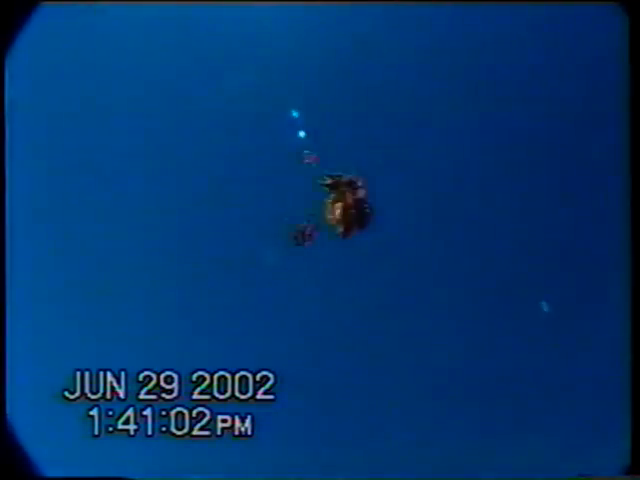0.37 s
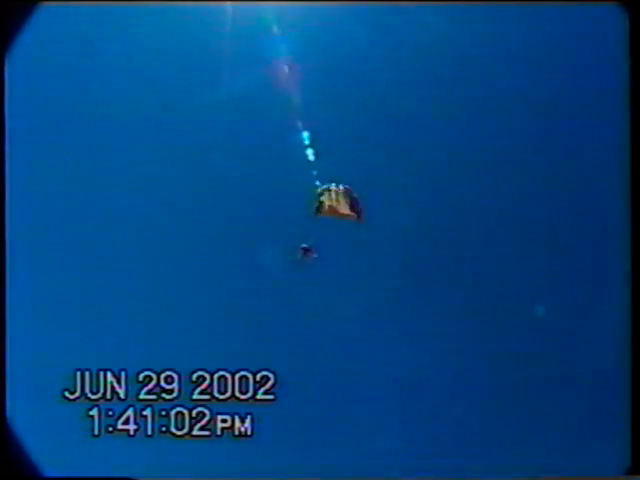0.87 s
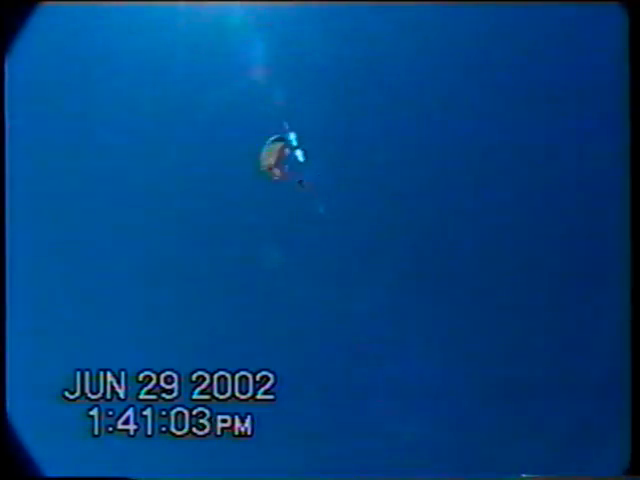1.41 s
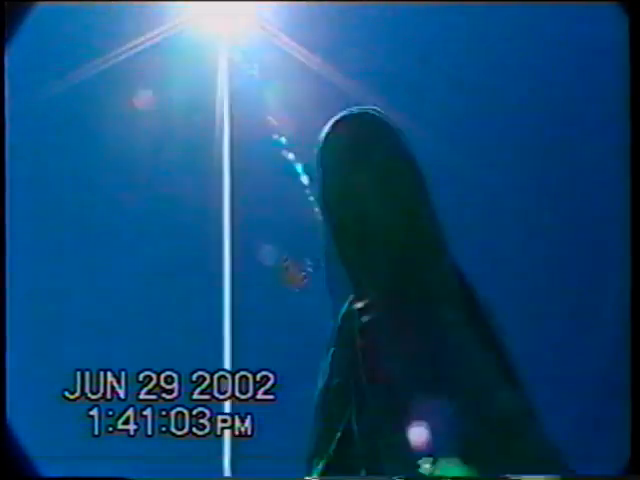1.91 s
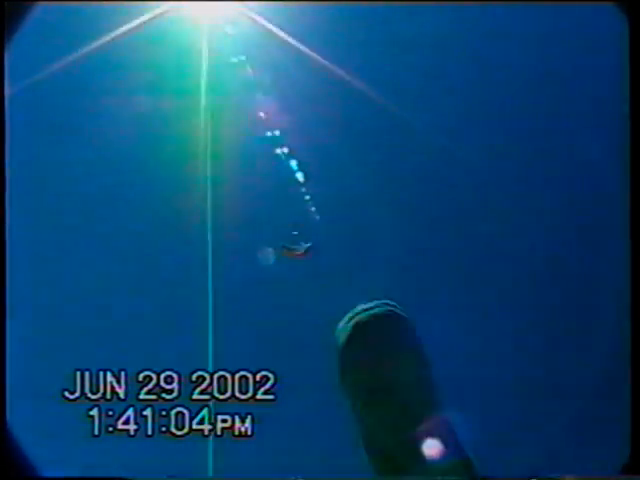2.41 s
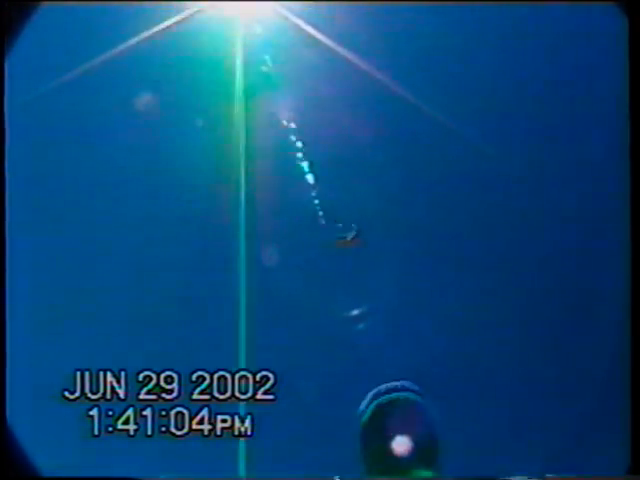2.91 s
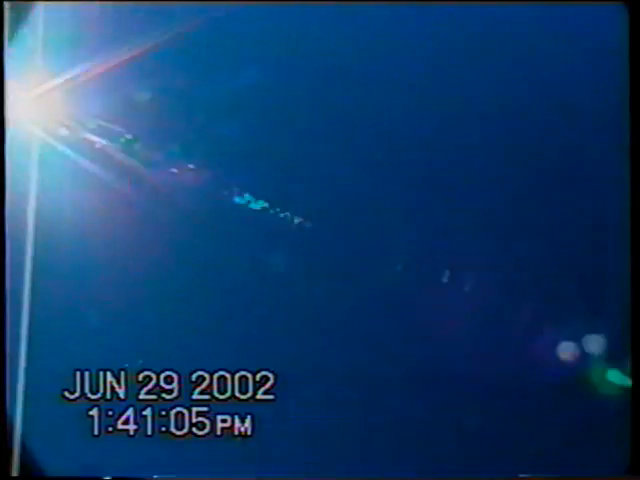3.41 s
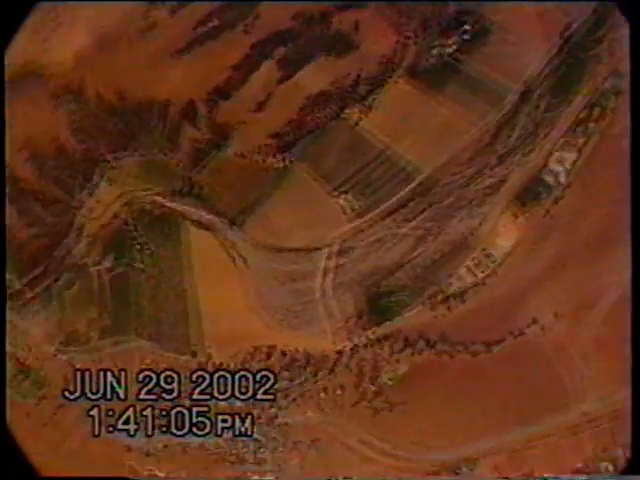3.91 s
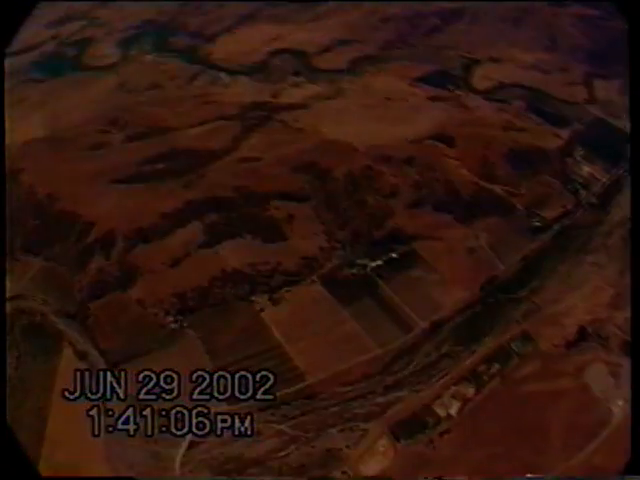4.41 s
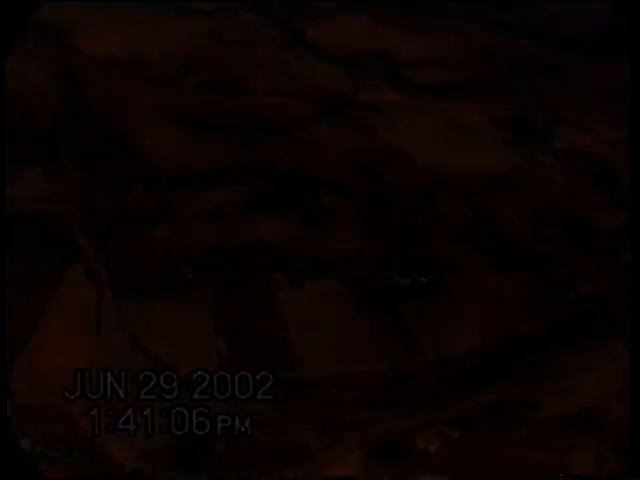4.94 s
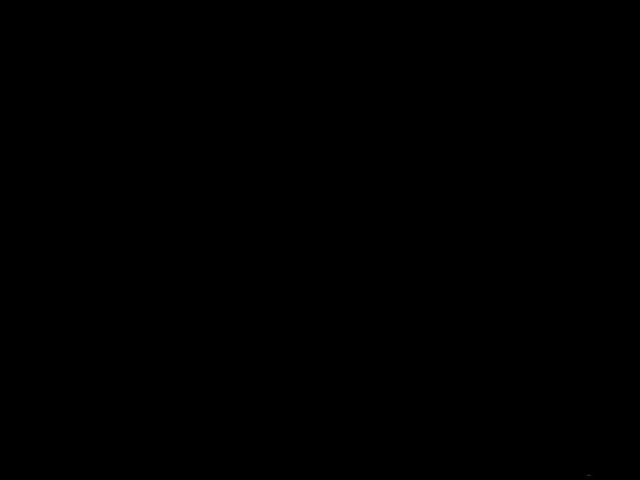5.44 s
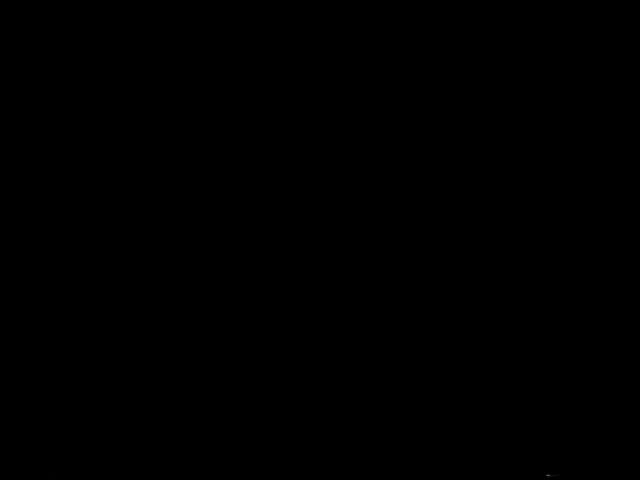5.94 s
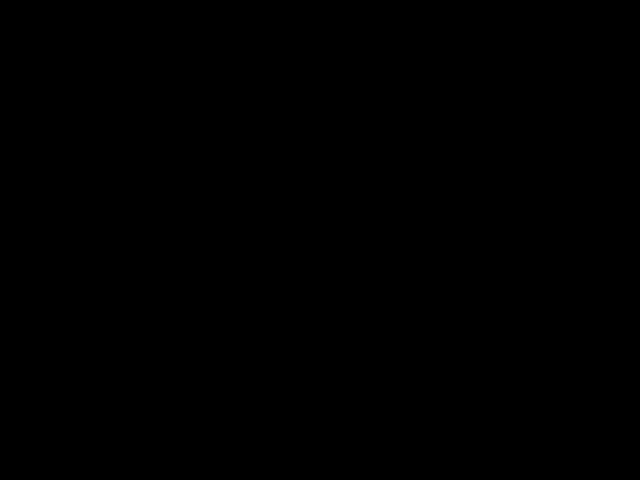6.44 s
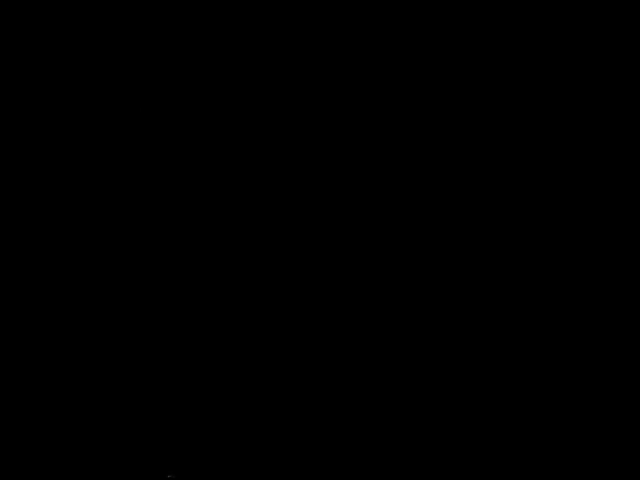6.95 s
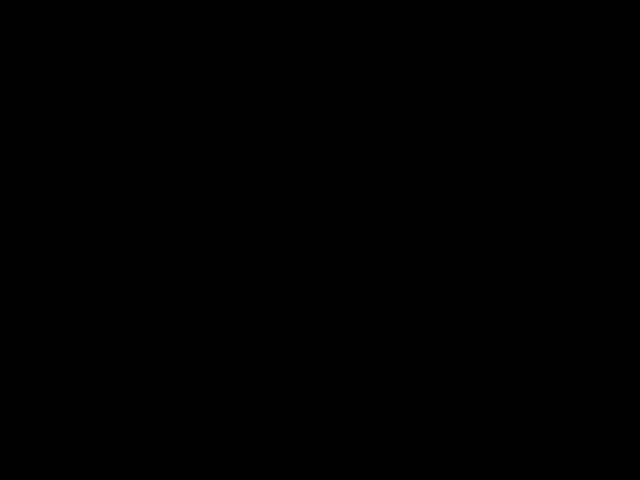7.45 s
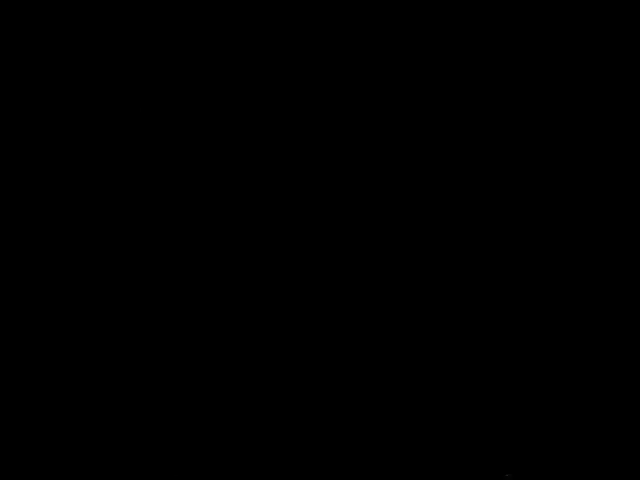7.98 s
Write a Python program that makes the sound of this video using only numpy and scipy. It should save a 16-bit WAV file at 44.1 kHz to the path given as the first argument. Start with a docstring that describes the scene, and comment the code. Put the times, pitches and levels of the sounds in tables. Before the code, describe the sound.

Freefall wind tears across a small camcorder microphone, badly overloaded. It starts as deep, ragged buffeting and thuds, quickly gaining a harsh, rushing upper roar. Near the middle, as the body rolls, the tone lurches and a breathy whistling edge comes forward. The thinner, brighter roar continues steadily, then fades out, leaving only faint tape hiss and a barely audible hum.

```python
"""Freefall wind tears over a small camcorder microphone: five sizes of eddy, each a gusting band of noise. They
drive the input far into overload: the signal slams between its limits, and the bass cut after it turns each
slam into a spike that sags back. The wind is then faded out, down to tape hiss (shaped noise) and a faint hum
(wavering sines). Left and right differ in brief narrow patches and by a small constant offset."""
import sys
import numpy as np
from scipy import signal
from scipy.fft import rfft, irfft, next_fast_len
from scipy.io import wavfile
from scipy.ndimage import map_coordinates

SR = 44100
rng = np.random.default_rng(int(sys.argv[2]) if len(sys.argv) > 2 else 0)


def pcm_store(signal):
    """Save signal as 16-bit PCM."""
    levels = np.round(np.clip(np.atleast_2d(signal), -1, 1) * 32767)
    wavfile.write(sys.argv[1], SR, levels.astype(np.int16).T)


def to_linear_factor(level_db):
    """Convert decibel levels (scalar or array-like) to linear amplitude factors."""
    exponent = np.asarray(level_db, float) / 20
    return 10 ** exponent


N = 356752

# tape hiss, spectrum shape: (frequency [Hz], relative density [dB])
HISS_SHAPE = [(20, -16), (70, -5.5), (150, -11), (400, -14.5), (800, -16), (1100, -20), (4000, -21),
              (14500, -24)]
# hum tones: (frequency [Hz], mean level [dB rms])
HUM_TONES = [(60, -78.5), (72, -70), (90, -76.5), (120, -82), (180, -84.5), (240, -78), (300, -84),
             (420, -87), (540, -88.5), (720, -86), (1020, -92.5), (1140, -88)]
# side signal where a patch is open: (frequency [Hz], level relative to shared sound [dB])
SIDE_LEVEL = [(60, -19.5), (150, -36.5), (370, -42), (700, -33), (1300, -24.5), (3000, -10.5),
              (8000, -13.5), (13900, -13.5)]
# chance that a side patch is open: (frequency [Hz], share of time [0-1])
PATCH_SHARE = [(0, .6), (400, .05), (1000, .35), (1800, .08), (6000, .08), (10000, .03), (13500, .12)]
# biggest eddies, spectrum shape: (frequency [Hz], relative density [dB])
THUD_SHAPE = [(20, -5.5), (60, -0.5), (130, -1.5), (250, -7), (600, -28.5), (3000, -47.5), (16000, -84.5)]
# middle-sized eddies: (centre [Hz], width of one pass [Hz], relative level [dB])
BUFFET_BANDS = [(320, 474, 0)]
# small eddies: (centre [Hz], width of one pass [Hz], relative level [dB])
SHEAR_BANDS = [(1560, 1780, 2), (5250, 5330, -12)]
# air ringing behind the grille: (centre [Hz], width of one pass [Hz], relative level [dB])
GRILLE_BANDS = [(2980, 1900, 0)]
# as the fall speeds up, big eddies fade and small ones grow:
# (time [s], fading of thud and buffet [0-1], growth of roar, shear and whistle [0-1])
EDDY_FINENESS = [(0, 0, .02), (.4, 0.24, 0.13), (.7, 0, .2), (.85, 0.34, 0.37), (1.05, 0.38, .75),
                 (1.6, 0.32, 0.46), (2.1, .45, 0.76), (2.6, 0.49, .8), (3.4, 0.51, .8), (3.9, 0.68, .95),
                 (4.2, 1, 0.99), (4.7, .95, .95), (5.4, 0.97, .8), (5.72, .7, .75), (6.1, 0.92, 0.89),
                 (6.37, 0.69, 0.79), (6.55, .95, .9), (7.5, .9, .98)]
# the body rolls over; the roar slides and thins, the grille faces the wind:
# (time [s], roar shift [Hz], roar gain [dB], shear gain [dB], whistle gain [dB])
BODY_ROLL = [(3.45, 0, 0, -0.5, -1), (3.53, -130, -4, 0, 2), (3.57, 250, -3, -0.5, 8),
             (3.62, 380, 1.5, 0.5, -2), (3.68, -200, -1.5, 0.5, 2.5), (3.73, 120, -0.5, 2.5, 7.5),
             (3.79, 400, -1.5, 2, 6), (3.86, 200, -5.5, 4.5, 7.5), (3.93, 100, -6.5, 3, 7.5),
             (4.02, 59.5, -8, -3, 9), (4.07, 0, 3.5, 1, 7.5), (4.12, 0, 0, 0, 0)]
# tape path response: (frequency [Hz], relative gain [dB])
TAPE_RESPONSE = [(30, -2.5), (100, 1), (300, -1.5), (600, 0), (1000, -1), (3000, 0), (6000, -2),
                 (10000, -6), (15000, -6.5)]
# wind after overload, before wobble and closing: (time [s], level [dB])
WIND_LEVEL = [(0, -25), (.12, -22.5), (1.2, -22), (2.1, -23), (3.4, -22), (3.85, -23.5), (4.2, -22.5),
              (5.4, -22), (6.1, -22), (6.4, -26), (6.52, -27), (6.85, -38), (7.05, -40.5), (7.3, -45),
              (7.35, -49.5), (7.42, -61), (7.47, -73)]


def unit(x):
    """Scaled to rms 1."""
    return x / np.sqrt(np.mean(x ** 2) + 1e-20)


def along(points, hz):
    """(Hz, value) points interpolated on a log frequency axis."""
    f, v = np.transpose(points)
    return np.interp(np.log(hz + 1), np.log(f + 1), v)


def curves(rows):
    """One value per sample for each column after the time."""
    s, *cols = np.transpose(rows)
    return [np.interp(np.arange(N) / SR, s, c) for c in cols]


def wobble(rate_hz):
    """A smooth random curve, rate_hz knots a second."""
    knots = rng.standard_normal(int(N * rate_hz / SR) + 4)
    return map_coordinates(knots, [np.arange(N) * rate_hz / SR])


def filtered(x, response):
    """x times a complex response of frequency."""
    m = next_fast_len(N + 8192)
    return irfft(rfft(x, m) * response(np.fft.rfftfreq(m, 1 / SR)), m)[..., :N]


def noise(response):
    """Fresh coloured noise of rms 1."""
    return unit(filtered(rng.standard_normal(N), response))


def resonances(modes):
    """Power sum of resonances, each applied twice for steep skirts."""
    def response(f):
        power = 0
        for centre_hz, width_hz, db in modes:
            once = f * width_hz / (centre_hz ** 2 - f * f + 1j * f * width_hz)
            power = power + abs(to_linear_factor(db) * once ** 2) ** 2
        return np.sqrt(power)
    return response


def swept(pitch_hz, width_hz):
    """A band of noise whose centre follows a curve: slow noise on two quadrature carriers."""
    slow = filtered(rng.standard_normal((2, N)), lambda hz: 1 / (1 + (2 * hz / width_hz) ** 2))
    phase = 2 * np.pi * np.cumsum(pitch_hz) / SR
    return unit(slow[0] * np.cos(phase) + slow[1] * np.sin(phase))


def squash(x, top, bottom, hardness):
    """Soft limits above and below."""
    limit = np.where(x > 0, top, bottom)
    return x / (1 + abs(x / limit) ** hardness) ** (1 / hardness)


def hum():
    """Faint sines, each wavering slightly in level."""
    t = np.arange(N) / SR
    total = np.zeros(N)
    for hz, db in HUM_TONES:
        tone = np.sin(2 * np.pi * (hz * t + rng.random()))
        total += to_linear_factor(db + 1.5 * wobble(8)) * np.sqrt(2) * tone
    return total


def hiss():
    """Steady tape hiss: shaped noise at a fixed rms."""
    hiss_db = -65.5
    return to_linear_factor(hiss_db) * noise(lambda hz: to_linear_factor(along(HISS_SHAPE, hz)) * (hz > 25))


def flicker(mono):
    """Side signal: the shared sound, phase-scrambled and kept only in brief narrow patches."""
    frame, patch_bins = 2048, 24
    hz, t, z = signal.stft(mono, SR, nperseg=frame)
    share = along(PATCH_SHARE, hz[::patch_bins])[:, None]
    is_open = rng.random((len(hz) // patch_bins + 1, len(t))) < share
    patches = np.repeat(is_open, patch_bins, axis=0)[:len(hz)]
    scrambled = abs(z) * np.exp(2j * np.pi * rng.random(z.shape))
    side = scrambled * patches * to_linear_factor(along(SIDE_LEVEL, hz))[:, None]
    return signal.istft(side, SR, nperseg=frame)[1][:N]


def drive(share, from_db, to_db, slow_db, quick_db):
    """Eddy strength: from_db at share 0 to to_db at share 1, with slow and quick random gusting."""
    trend_db = from_db + (to_db - from_db) * share
    return to_linear_factor(trend_db + slow_db * wobble(3.88) + quick_db * wobble(25))


def whistle(grown, gain_db):
    """Air rings behind the grille: resonant noise."""
    strength = drive(grown, from_db=-14, to_db=-5.5, slow_db=1.2, quick_db=1.5)
    return strength * to_linear_factor(gain_db) * noise(resonances(GRILLE_BANDS))


def shear(grown, gain_db):
    """Small eddies: noise in fixed upper bands."""
    strength = drive(grown, from_db=-8, to_db=1, slow_db=0.84, quick_db=0.54)
    return strength * to_linear_factor(gain_db) * noise(resonances(SHEAR_BANDS))


def roar(grown, shift_hz, gain_db):
    """A broad noise band whose centre rises with growth, drifts at random and shifts with the roll."""
    centre_hz, rise_hz, drift_hz = 589.8, 130.1, 29.995
    pitch_hz = centre_hz + rise_hz * grown + drift_hz * wobble(2.5) + shift_hz
    strength = drive(grown, from_db=4.2, to_db=5.02, slow_db=0.4, quick_db=1.4)
    return strength * to_linear_factor(gain_db) * swept(pitch_hz, width_hz=750)


def buffet(faded):
    """Middle-sized eddies: one resonant band of noise."""
    strength = drive(faded, from_db=8, to_db=-3.5, slow_db=0.4, quick_db=1)
    return strength * noise(resonances(BUFFET_BANDS))


def thud(faded):
    """Biggest eddies: bass-heavy noise."""
    strength = drive(faded, from_db=13, to_db=-12.5, slow_db=1.4, quick_db=2.5)
    return strength * noise(lambda hz: to_linear_factor(along(THUD_SHAPE, hz)))


def pressure():
    """Eddies of five sizes press on the diaphragm, each gusting on its own."""
    faded, grown = curves(EDDY_FINENESS)
    shift_hz, roar_db, shear_db, whistle_db = curves(BODY_ROLL)
    big = thud(faded) + buffet(faded)
    small = shear(grown, shear_db) + whistle(grown, whistle_db)
    return big + roar(grown, shift_hz, roar_db) + small


def capsule(air):
    """The input stage saturates, sooner downward than upward; two bass cuts make flat tops sag past zero."""
    slammed = squash(air + 0.16, top=2.3, bottom=0.96, hardness=1.5)
    cut_hz, lower_cut_hz = 370, 70
    spikes = unit(filtered(slammed, lambda hz: 1j * hz / (cut_hz + 1j * hz) * 1j * hz / (lower_cut_hz + 1j * hz)))
    bend = 0.13  # lopsided amplifier: stretches upward spikes, blunts downward ones
    bent = np.expm1(bend * spikes) / bend
    return unit(filtered(bent, lambda hz: to_linear_factor(along(TAPE_RESPONSE, hz)) * (hz > 15)))


def wind():
    """Overloaded wind, slightly wavering in level, faded and then closed off."""
    level_db, = curves(WIND_LEVEL)
    end_s, closing_s = 7.5, 0.029
    closed = np.clip((end_s - np.arange(N) / SR) / closing_s, 0, 1)
    return closed * to_linear_factor(level_db + 0.37 * wobble(9)) * capsule(pressure())


def scene():
    """One microphone signal with hiss and hum in both channels, parted by the flickering side signal."""
    mono = wind() + hum() + hiss()
    side = flicker(mono)
    return np.array([mono + side, mono - side])


def band_limit(x):
    """A steep low-pass at the top of the band."""
    return signal.sosfilt(signal.butter(12, 14530, fs=SR, output="sos"), x)


def record(dry):
    """The topmost treble opens for a while, and a small constant offset in each channel."""
    open_s, close_s = 4.55, 6.95
    narrow_top_hz, wide_top_hz, top_band_db = 13650, 14400, -2.5
    t = np.arange(N) / SR
    narrow = filtered(dry, lambda hz: hz < narrow_top_hz)
    top_band = filtered(dry - narrow, lambda hz: hz < wide_top_hz)
    is_open = (t > open_s) & (t < close_s)
    offset = np.array([[0.0142], [0.0114]])  # left, right
    return band_limit(narrow + to_linear_factor(top_band_db) * is_open * top_band + offset)


dry = scene()
out = record(dry)
pcm_store(out)
```